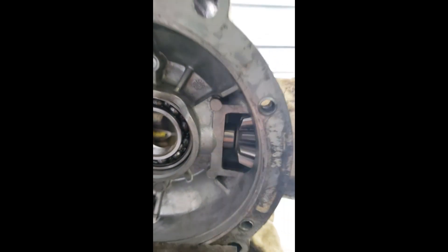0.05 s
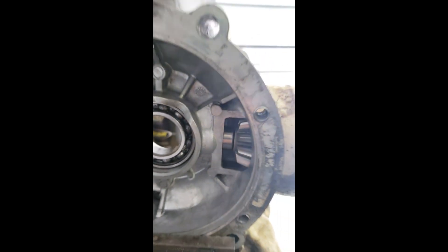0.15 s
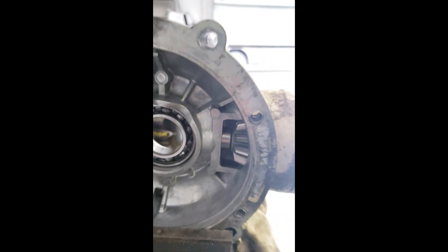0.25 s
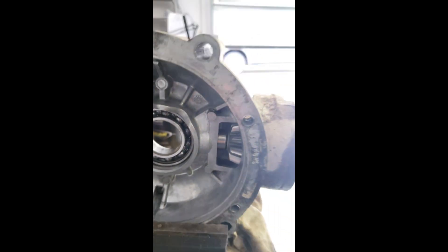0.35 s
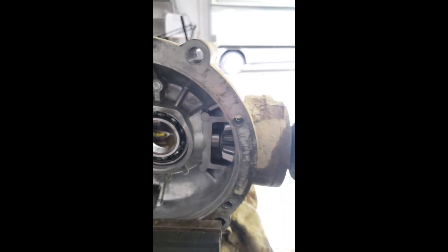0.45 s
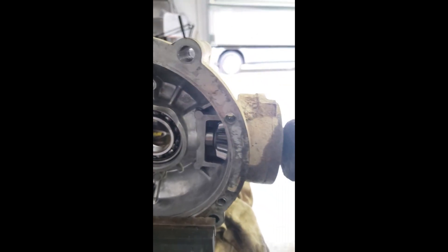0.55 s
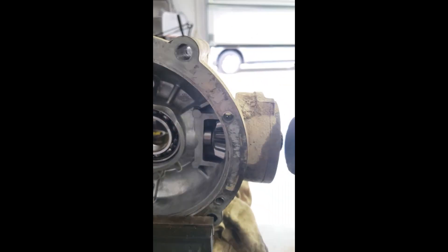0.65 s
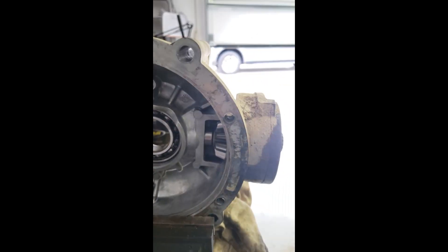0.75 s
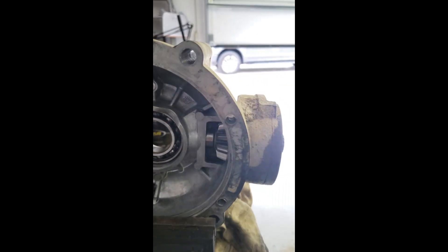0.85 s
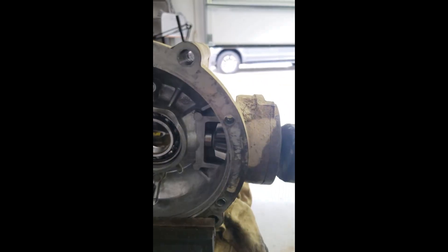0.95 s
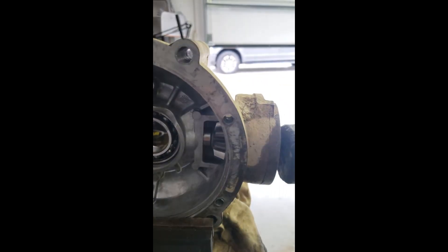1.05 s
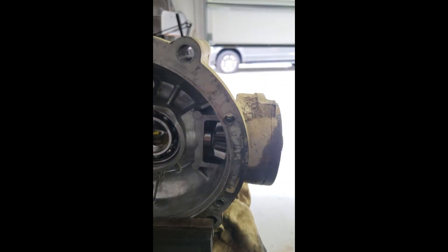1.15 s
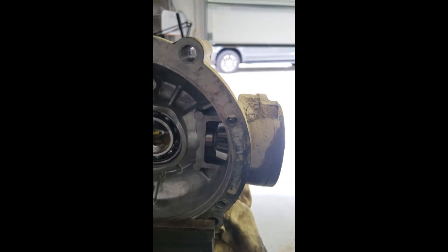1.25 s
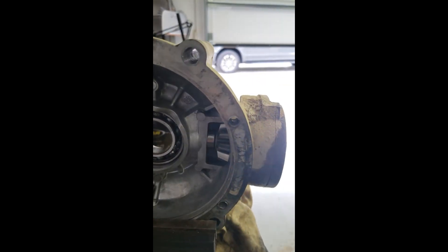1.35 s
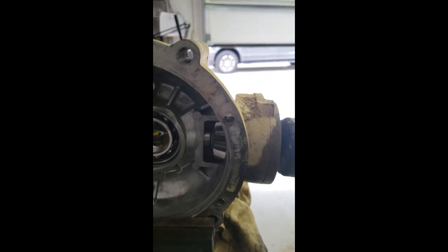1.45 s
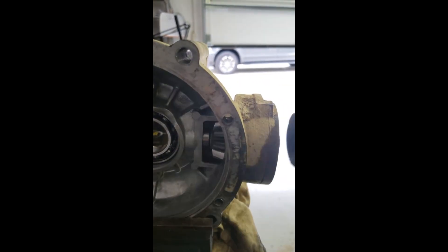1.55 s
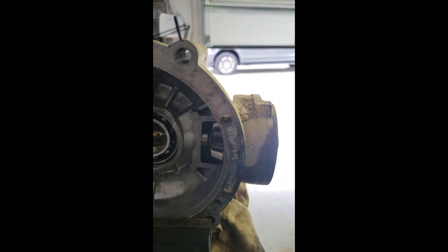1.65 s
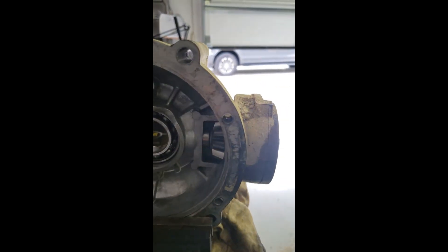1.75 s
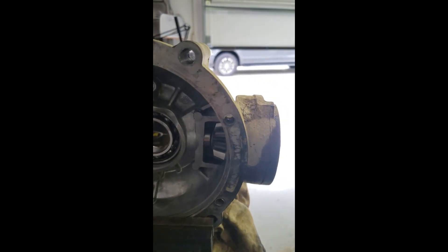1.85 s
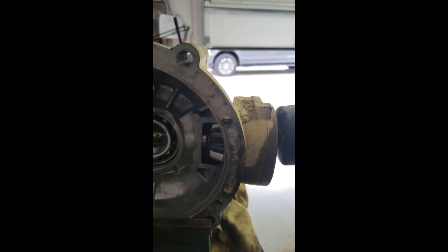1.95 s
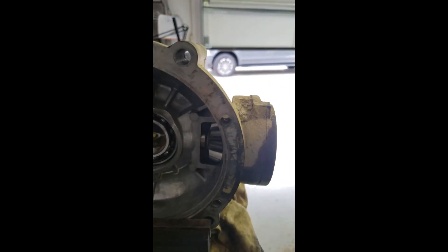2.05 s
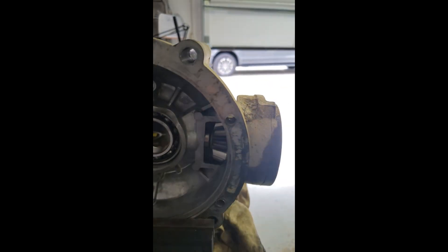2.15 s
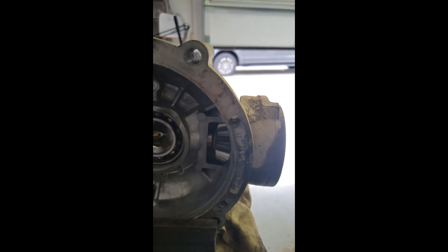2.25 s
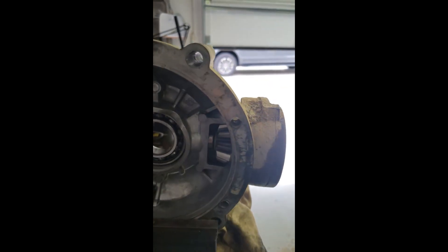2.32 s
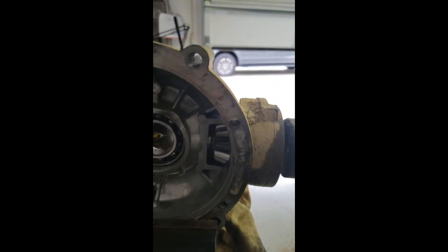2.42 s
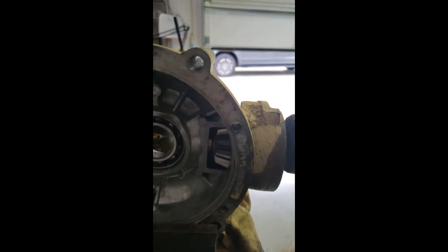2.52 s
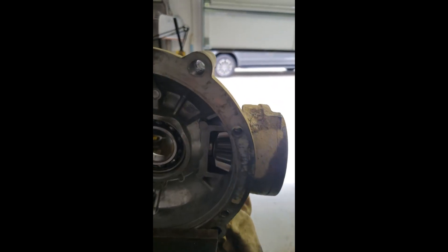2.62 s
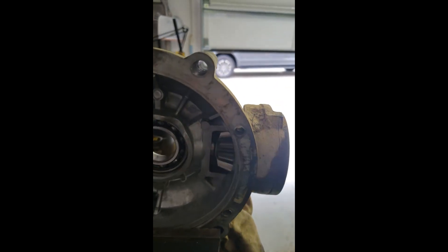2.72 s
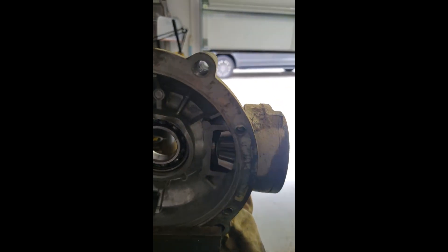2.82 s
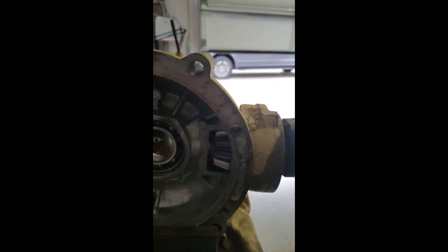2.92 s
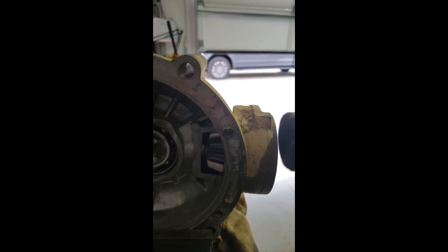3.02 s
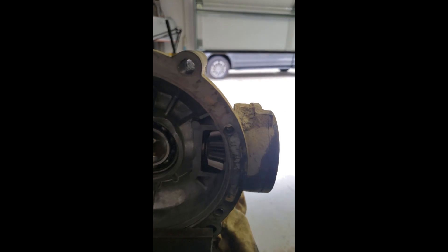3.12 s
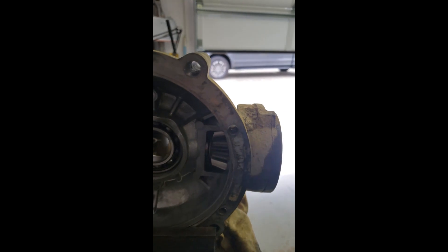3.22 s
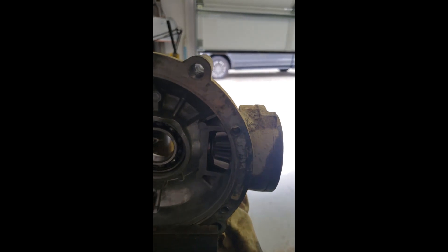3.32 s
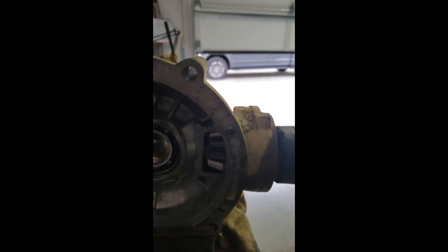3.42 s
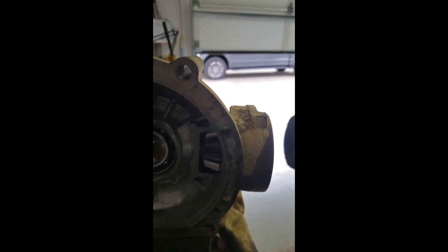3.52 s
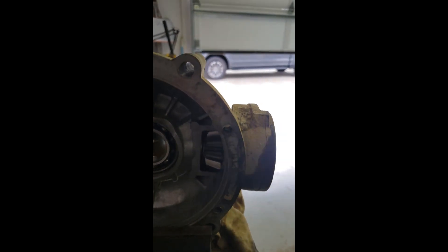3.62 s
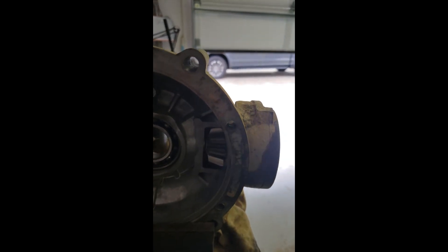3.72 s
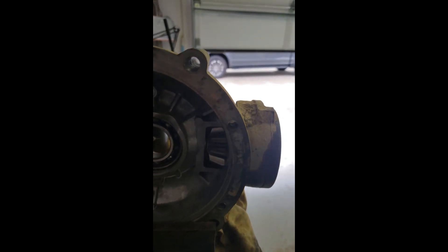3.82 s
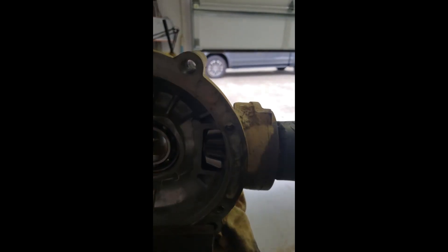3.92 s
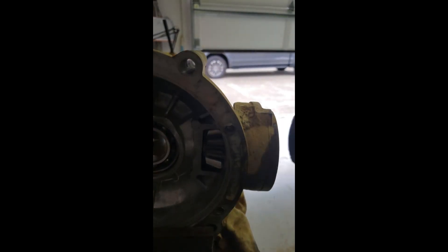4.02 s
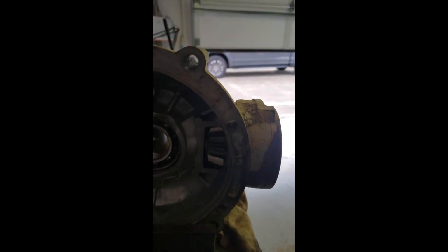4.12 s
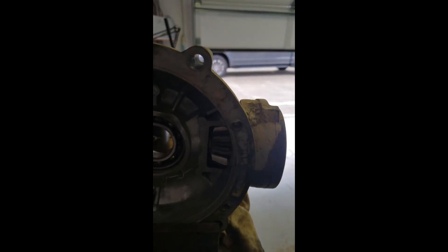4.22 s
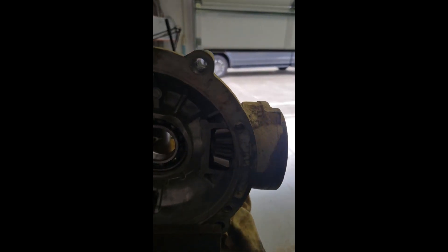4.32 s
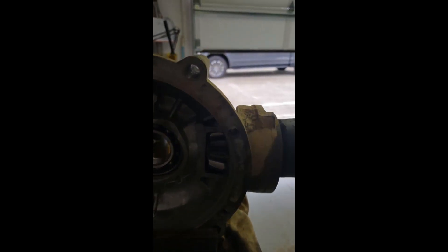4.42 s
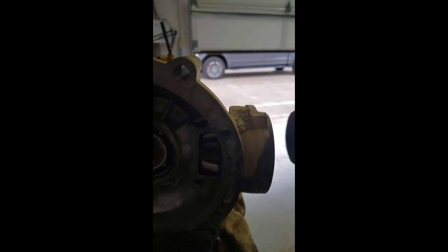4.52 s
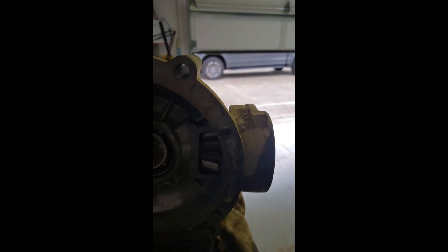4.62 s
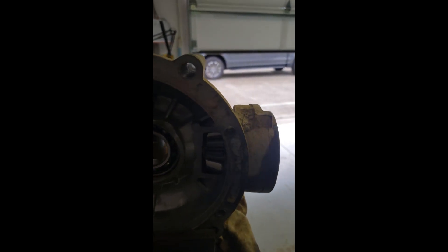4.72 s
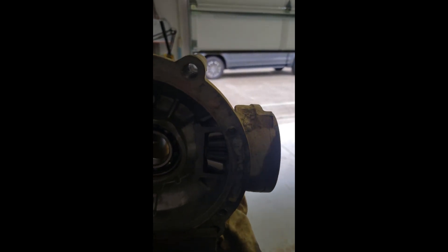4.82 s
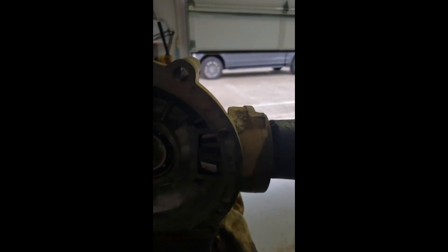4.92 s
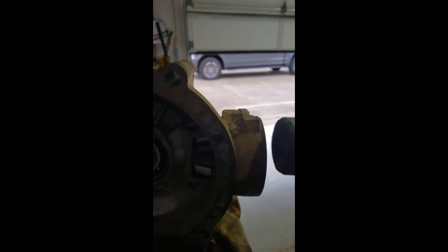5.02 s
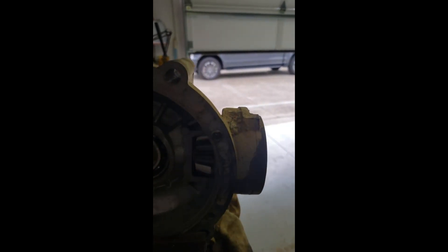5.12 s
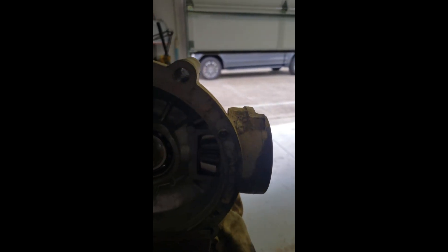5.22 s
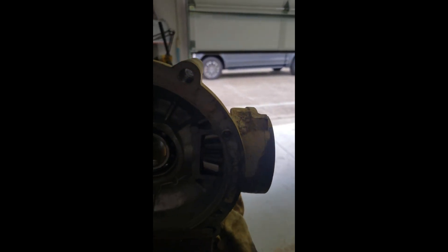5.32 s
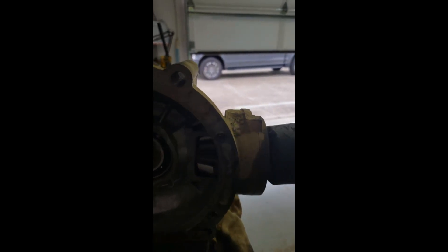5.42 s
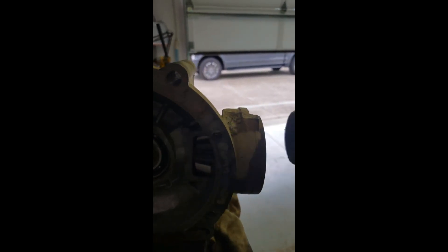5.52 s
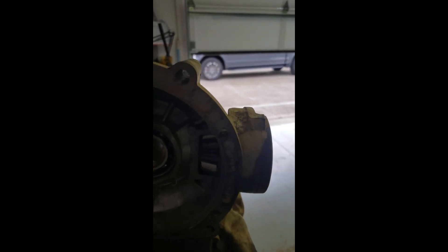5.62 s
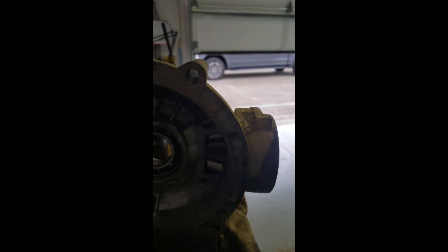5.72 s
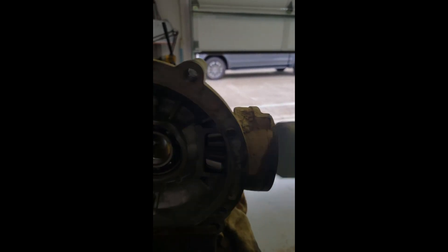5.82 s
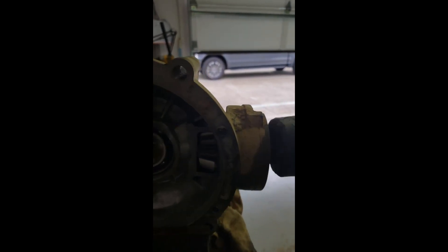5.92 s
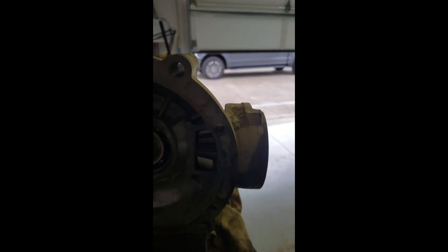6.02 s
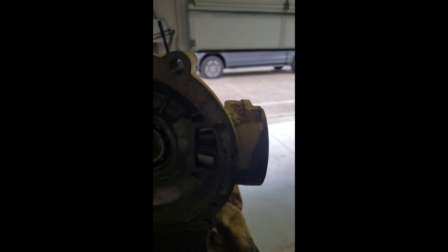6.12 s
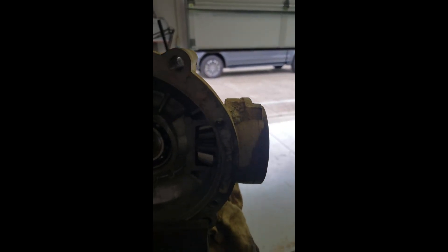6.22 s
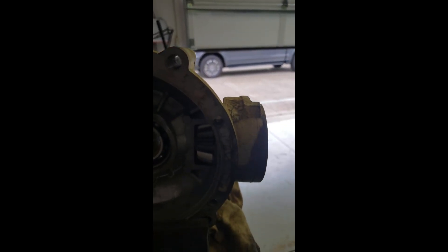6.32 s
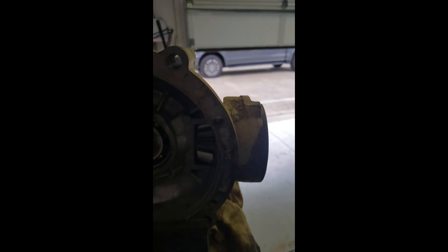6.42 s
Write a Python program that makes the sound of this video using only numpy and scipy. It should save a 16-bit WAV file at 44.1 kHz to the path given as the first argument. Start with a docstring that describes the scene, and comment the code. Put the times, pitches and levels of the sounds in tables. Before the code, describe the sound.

Close, even mallet blows thud and clank on a metal casting, a loose gear rattling after the later hits.

```python
"""A workshop, on the two microphones of a hand-held phone, close to a cast housing on the bench.
A rubber mallet drives a steel gear into it, two blows a second. Each blow thuds through the housing
and clanks the gear against its seat; once the gear has play, it chatters at the blow, springs back and
drops onto its seat a tenth of a second later. A far wall and a short room tail answer, over low
rumble, soft handling bumps, a faint far whine and a fading hiss."""
import sys
import numpy as np
from scipy import signal
from scipy.fft import rfft, irfft
from scipy.io import wavfile
from scipy.ndimage import uniform_filter1d

SR = 44100
rng = np.random.default_rng(int(sys.argv[2]) if len(sys.argv) > 2 else 0)


def log_audio(samples):
    """Write samples as a 16-bit WAV file to the path given in sys.argv[1]."""
    # one column per channel
    frames = np.atleast_2d(samples).T
    # limit to full scale, then quantise
    limited = np.clip(frames, -1, 1)
    pcm = np.round(limited * 32767).astype(np.int16)
    wavfile.write(sys.argv[1], SR, pcm)


N = 284753
T = np.arange(int(SR / 6)) / SR  # time within one short sound [s]
LEFTWARD = np.array([[1], [-1]])  # raises the left microphone, lowers the right
LIGHT_TREBLE_DB = -4  # light contacts are duller than a blow

# mallet blows; squareness is how much of the force reaches the gear: (time [s], force [dB],
# squareness [dB], wall knock over force [dB], upper over lower gear modes [dB])
BLOWS = [(-.002, -27, 0.5, -2, 2), (0.5057, -26.5, -2, 2, 5), (1.014, -25.5, -6, -3, -5),
         (1.5209, -21, -6, -7, 2), (1.996, -22, 4, 0.5, -4), (2.5107, -22.5, 5, 0.5, -3),
         (2.99, -23.5, 7, .5, -6.5), (3.48, -22.5, 4.5, -5, -1), (3.98, -23.5, 8.5, -1, 3.5),
         (4.4829, -25, 4, 0.5, -5.5), (4.9906, -25, 6.3, -10, 0.5), (5.47, -23.5, 6, -14, 1.5),
         (5.931, -24.5, 9, 0.5, 0.5)]
# gear and bearing modes: (frequency [Hz], level [dB], t60 [s], lead at the left microphone [ms])
GEAR = [(2094, -3.5, 0.11, -0.14), (2154, -8.5, 0.12, -0.062), (2919, -5.5, 0.054, 0.084),
        (2885, 0.5, .07, .09), (3135, -4.5, 0.044, 0.12), (3990, -19.5, 0.13, 0.05), (4270, -4, 0.049, .1),
        (4766, -1.5, 0.051, -0.16), (5050, -1, 0.025, -0.052), (5043, 2, 0.055, -0.045),
        (5090, -3.5, 0.03, -0.0084), (5780, -7, .08, -0.0013), (6140, -0.5, 0.058, 0.068),
        (6390, -8, 0.054, -0.035), (6970, -10.5, 0.068, -.04), (8100, -18.5, 0.03, -0.077),
        (11400, -25.5, 0.23, 0.036), (15530, -10.5, .05, -0.098)]


def thud(pattern):
    """The rubber head shoves the housing: one pressure dip, then its low modes."""
    # modes of the housing on its bench: (frequency [Hz], level [dB], t60 [s])
    housing = [(96, 3, 0.1), (154.3, -4, 0.21), (194, -5.5, 0.034), (226.7, 5, 0.078), (273.34, 3, 0.2),
               (301, -1, 0.13), (378.1, -4.5, 0.13), (469, -0.5, .07), (552, 1, 0.038), (594, 6, .07),
               (666, 2.5, 0.044), (751.6, -5.5, 0.13), (775, -5, 0.27)]
    # dense modes of the casting: (frequency [Hz], level [dB])
    spectrum = [(40, -9), (90, -8), (250, 0.5), (390, -1.5), (560, 3), (1200, -8), (2500, -17),
                (8000, -45.5)]
    modes, chance = struck(housing, scatter_db=0.5, detune=0.035, grip_db=-13.5, grip_t60=0.011,
                           blur_hz=18)
    body = -(modes * np.exp(1.6j * chance)).imag.sum(0)
    push = T / .0003
    dip = -push * (2 - push) * np.exp(-push)
    casting = dense_ring(pattern, spectrum, crack_t60=0.0064, ring_t60=0.21, ring_db=-11,
                         rise_s=0.00013, alike_hz=550, change=0.39)
    sound = undb(-2) * burst(body) + undb(-8.5) * burst(dip) + undb(-4) * casting
    return sound * undb(.8 * LEFTWARD)


def knock():
    """The hollow note of the casting's walls, which face the two microphones differently."""
    # wall modes: (frequency [Hz], level [dB], t60 [s])
    walls = [(859, 0, 0.05), (950, 0, 0.023), (1086, -1, 0.057), (1168, -3, 0.055), (1242, -4.5, 0.054),
             (1290, -2, 0.027), (1470, -7.5, 0.044), (1680, -3, 0.078), (1800, -5, 0.04),
             (1960, -8.5, 0.082)]
    modes, chance = struck(walls, scatter_db=4, detune=0.016, grip_db=9, grip_t60=.018, blur_hz=9.9)
    modes = modes * np.exp(np.pi * 1j * chance) * (1 - np.exp(-T / 0.00063))
    apart = np.exp(1.3j * rng.standard_normal(chance.shape))
    return burst(np.array([modes.imag.sum(0), (modes * apart).imag.sum(0)]))


def clank(pattern, treble_db):
    """Steel cracks on steel; treble_db tilts the top of the spectrum."""
    # dense upper modes of the steel: (frequency [Hz], level [dB])
    steel = [(200, -3.5), (600, -3), (1100, -1.5), (1700, 1), (2450, 0.5), (2900, 0.5), (3500, -2.5),
             (5000, 0.5), (6300, -9), (8000, -10), (9500, -21.5), (10800, -23), (12000, -14),
             (15500, -18.5)]
    spectrum = [(hz, db + at([(4000, 0.01), (12000, treble_db)], hz)) for hz, db in steel]
    return dense_ring(pattern, spectrum, crack_t60=0.022, ring_t60=0.09, ring_db=-11.5,
                      rise_s=0.00098, alike_hz=750, change=0.66)


def gear_ring(upper_db):
    """The point of contact favours the gear's lower or upper modes; each radiates its own way."""
    table = np.array(GEAR)
    hz, lead_s = table[:, :1], table[:, 3:] / 1000
    modes, chance = struck(table[:, :3], scatter_db=2, detune=0.0072, grip_db=10, grip_t60=0.011,
                           blur_hz=22)
    onset = 1 - np.exp(-(T / 0.0012) ** 2)
    left = modes * undb(upper_db * (hz > 4500)) * np.exp(np.pi * 1j * chance) * onset
    right = left * np.exp(-2j * np.pi * hz * lead_s)
    return burst(np.array([left.imag.sum(0), right.imag.sum(0)]))


def contacts():
    """Gear meets seat in strikes and rattles: (time [s], clank, ring, upper modes, treble [dB])."""
    # the gear springs back or drops onto its seat: the rows at 0.048 s and 1.567 s spring back # about 45 ms
    # after a blow, the later rows drop back onto the seat # (time [s], clank [dB], ring over clank [dB], upper
    # over lower gear modes [dB])
    drops = [(.048, -43.5, -1.5, -17), (1.5669, -38, -5, -10), (3.581, -37, -6.5, 8),
             (4.085, -38.5, 1.5, 18), (4.585, -43, 1.5, 13), (4.646, -55, -10, -3), (5.103, -50.5, 5, 2),
             (5.574, -52.5, 3, 1), (6.046, -47, 3, 10)]
    loose_from_s, chatter_s, rebound_s = 2.8, 0.0082, .0445
    strikes, rattles = [], []
    for s, force_db, square_db, _, upper_db in BLOWS:
        clank_db = force_db + 1.35 + 0.42 * square_db  # a square blow clanks harder
        ring_db = force_db + square_db
        treble_db = 3.5 + .8 * (force_db + 23)  # a harder blow is brighter
        strikes.append((s, clank_db, ring_db, upper_db, treble_db))
        if s > loose_from_s:
            # the loose gear hits again at once, harder after a square blow, then springs back
            chatter_db = -19 + 1.6 * square_db
            rattles.append((s + chatter_s, clank_db + chatter_db, ring_db + chatter_db, 3.5, treble_db))
            rattles.append((s + rebound_s, clank_db - 21, ring_db - 21.5, -0.5, LIGHT_TREBLE_DB))
    for s, clank_db, ring_over_db, upper_db in drops:
        rattles.append((s, clank_db, clank_db + ring_over_db, upper_db, LIGHT_TREBLE_DB))
    return strikes, rattles


def chink():
    """The loose bearing race chinks when the steel rattles."""
    # modes of the race: (frequency [Hz], level [dB], t60 [s])
    race = [(3120, -5.5, 0.056), (4840, -0.5, 0.054), (4830, -8.5, 0.037), (6700, -9, 0.063),
            (11400, -17.5, 0.18)]
    modes, chance = struck(race, scatter_db=3, detune=0.0025, grip_db=-1, grip_t60=.015, blur_hz=7.7)
    ring = (modes * np.exp(np.pi * 1j * chance)).imag.sum(0)
    return burst(ring * (1 - np.exp(-T / .0012)))


def shudder():
    """The gear slips in its seat and its lowest mode swells for a moment."""
    rough = 1 + 1.7 * uniform_filter1d(rng.standard_normal(len(T)), size=80)
    swell = (1 - np.exp(-T / 0.0027)) * fade(T, 0.063)
    return burst(swell * rough * np.sin(2 * np.pi * GEAR[0][0] * T))


def workshop(into_room, toward_wall):
    """A diffuse tail that lasts longest in the low mids, and a scattered slap from the far wall."""
    # decay of the tail: (frequency [Hz], t60 [s])
    decay = [(100, 0.3), (300, 0.4764), (700, 0.3532), (2000, 0.3647), (5000, 0.2626), (14000, 0.32)]
    # colour of the tail: (frequency [Hz], level [dB])
    tail_spectrum = [(60, -14), (160, -1.5), (400, -10.5), (900, -16.5), (2200, -17), (3200, -13.5),
                     (5500, -17), (14000, -18)]
    # colour of the slap: (frequency [Hz], level [dB])
    slap_spectrum = [(60, -21.5), (160, -12.5), (400, -18), (900, -23), (3000, -23), (5000, -26),
                     (14000, -29.5)]
    slap_s, slap_t60 = .0435, .08
    t = np.arange(int(SR * .6)) / SR
    hz, centres = np.fft.rfftfreq(len(t), 1 / SR), [f for f, _ in decay]
    bands = np.array([at(list(zip(centres, share)), hz) for share in np.eye(len(centres))])[:, None]
    tails = np.array([fade(t, t60) for _, t60 in decay])[:, None] * (1 - np.exp(-(t / 0.015) ** 2))
    tails /= np.linalg.norm(tails, axis=2, keepdims=True)
    slap = (t > slap_s) * fade(np.abs(t - slap_s), slap_t60)
    slap /= np.linalg.norm(slap)
    # the hand-held phone drifts, so each blow meets a new pattern of echoes
    edges = [0] + [int(row[0] * SR) for row in BLOWS[1:]] + [N]
    out = np.zeros((2, N))
    for a, b in zip(edges, edges[1:]):
        band_noise = irfft(rfft(pair_noise(len(t), 710)) * bands, len(t))
        tail = colour((band_noise * tails).sum(0), tail_spectrum)
        echo = colour(slap * pair_noise(len(t), 700), slap_spectrum)
        add(out, a / SR, signal.fftconvolve(into_room[:, a:b], tail, axes=1))
        add(out, a / SR, signal.fftconvolve(toward_wall[:, a:b], echo, axes=1))
    return out


def handling_bumps():
    """The hand bumps softly against the phone, a short low note each time."""
    # (time [s], level [dB], pitch [Hz])
    bumps = [(0.893, -37, 128), (3.269, -40.5, 137), (3.394, -43, 82), (3.46, -38, 111), (4.766, -48, 89),
             (5.403, -44.5, 119), (5.731, -39.5, 66), (6.396, -45, 73)]
    out = np.zeros((2, N))
    for s, db, hz in bumps:
        add(out, s, undb(db) * burst(T * fade(T, 0.026) * np.sin(2 * np.pi * hz * T)))
    return out


def far_whine(flutter):
    """A faint, wavering whine far off swells and dies away."""
    # swells: (time [s], level [dB])
    swells = [(1.15, -80), (2.15, -75), (3.15, -74)]
    pitch_hz, rise_s = 1500, .07
    tone = np.sin(2 * np.pi * np.cumsum(pitch_hz + 3 * flutter) / SR)
    out = np.zeros(N)
    for s, db in swells:
        age = np.maximum(np.arange(N) / SR - s, 0)
        out += undb(db) * (1 - np.exp(-age / rise_s)) * fade(age, t60=2.7) * tone
    return out


def room_tone():
    """Restless rumble and smooth, fading hiss, with the far whine among them."""
    # colour of the rumble: (frequency [Hz], level [dB])
    rumble_spectrum = [(20, -25), (45, -9), (80, 1.5), (120, -1.5), (190, -14.5), (280, -14.5),
                       (400, -31.5), (800, -34.5), (1600, -42.5), (4000, -63)]
    # course of the rumble: (time [s], relative level [dB])
    rumble_level = [(0.0, -55.5), (1.94, -54), (2.88, -64.5), (3.4, -50), (4.04, -58), (4.24, -64),
                    (5.79, -55.5), (5.95, -63), (6.46, -57.5)]
    # colour of the hiss: (frequency [Hz], level [dB])
    hiss_spectrum = [(100, 7), (700, 1.5), (1300, -1.5), (2600, -2.5), (3900, 3), (7300, 1.5), (8500, -7.5),
                     (11000, -6.5), (15500, -4.5)]
    # course of the hiss: (time [s], relative level [dB])
    hiss_level = [(0.0, -68.5), (2.03, -72.5), (3.02, -72.5), (5.0, -82.5), (6.46, -84.5)]
    rumble = colour(pair_noise(N, 120), rumble_spectrum)
    hiss = colour(pair_noise(N, 600), hiss_spectrum)
    # air stirring at each microphone port adds unrelated bass: (frequency [Hz], level [dB])
    port_air = [(20, -6), (70, 4), (130, -5.5), (400, -46), (4000, -79.5)]
    rumble += colour(rng.standard_normal((2, N)), port_air)
    knots = np.arange(0, N, SR // 12)
    flutter = np.interp(np.arange(N), knots, rng.standard_normal(len(knots)))
    rumble *= undb(curve(rumble_level) + 4.5 + 1.2 * flutter) / rumble.std()
    hiss *= undb(curve(hiss_level) + 5.5) / hiss.std()
    return rumble + hiss + far_whine(flutter)


def struck(table, scatter_db, detune, grip_db, grip_t60, blur_hz):
    """Modes varied by each blow, damped and blurred by the rubbing seat, and a random draw for each."""
    hz, db, t60 = np.transpose(table)[:, :, None]
    weight, tuning, chance = rng.standard_normal((len(hz), 3)).T[:, :, None]
    size = undb(db + scatter_db * weight) * fade(T, t60) * (1 + undb(grip_db) * fade(T, grip_t60))
    wander = np.cumsum(rng.standard_normal(size.shape), axis=1) * np.sqrt(2 * np.pi * blur_hz / SR)
    phase = 2 * np.pi * hz * (1 + detune * tuning) * T + uniform_filter1d(wander, size=130, axis=1)
    return size * np.exp(1j * phase), chance


def dense_ring(pattern, spectrum, crack_t60, ring_t60, ring_db, rise_s, alike_hz, change):
    """Countless close modes: a crack, then a ring; their pattern shifts a little from blow to blow."""
    grain = pattern + change * pair_noise(len(T), alike_hz)
    onset = 1 - np.exp(-(T / rise_s) ** 2)
    decay = fade(T, crack_t60) + undb(ring_db) * fade(T, ring_t60)
    return burst(colour(grain * onset * decay, spectrum))


def pair_noise(count, alike_hz):
    """White noise at two microphones: alike in the bass, unrelated in the treble."""
    mid, side = rfft(rng.standard_normal((2, count)))
    alike = 1 / (1 + (np.fft.rfftfreq(count, 1 / SR) / alike_hz) ** 2)
    return irfft(mid * np.sqrt((1 + alike) / 2) + LEFTWARD * side * np.sqrt((1 - alike) / 2), count)


def colour(x, points, size=8192):
    """Causal filter with the response (frequency [Hz], level [dB])."""
    cepstrum = irfft(np.log(undb(at(points, np.fft.rfftfreq(size, 1 / SR)))))
    cepstrum[1:size // 2] *= 2
    cepstrum[size // 2 + 1:] = 0
    impulse = irfft(np.exp(rfft(cepstrum)))[None, :size // 2]
    return signal.fftconvolve(x, impulse, axes=1)[:, :x.shape[1]]


def burst(x):
    """Let a short sound die out smoothly and scale it to the energy of 10 ms at full level."""
    x = x * np.minimum(1, 2 * (1 - T / T[-1]))
    return x / np.sqrt(np.mean(np.sum(x ** 2, axis=-1)) * 100 / SR)


def undb(db):
    """Decibels to gain."""
    return 10 ** (np.asarray(db) / 20)


def fade(t, t60):
    """Exponential decay, 60 dB in t60 seconds."""
    return np.exp(-np.log(1000) * t / t60)


def curve(rows):
    """Join timed levels by straight lines."""
    return np.interp(np.arange(N) / SR, *np.transpose(rows))


def at(points, hz):
    """Read a spectrum on a log-frequency axis."""
    f, db = np.transpose(points)
    return np.interp(np.log(np.maximum(hz, 1)), np.log(f), db)


def add(out, s, x):
    """Mix a short sound in at time s."""
    i = int(round(s * SR))
    a, b = max(i, 0), min(i + x.shape[-1], N)
    out[:, a:b] += x[..., a - i:b - i]


def scene():
    """Blows and rattles on the same steel close up, with the workshop behind."""
    # the gear slips: (time [s], shudder level [dB], clank level [dB])
    slips = [(.521, -31, -34), (5.949, -26, -22)]
    body, gear = np.zeros((2, 2, N))
    casting, steel = pair_noise(len(T), 1400), pair_noise(len(T), 630)
    for s, force_db, _, knock_db, _ in BLOWS:
        add(body, s, undb(force_db) * (thud(casting) + undb(knock_db) * knock()))
    strikes, rattles = contacts()
    for s, clank_db, ring_db, upper_db, treble_db in strikes + rattles:
        add(body, s, undb(clank_db) * clank(steel, treble_db))
        add(gear, s, undb(ring_db) * gear_ring(upper_db))
    # the race has little play, so its chink grows more slowly than the rattle
    for s, _, ring_db, *_ in rattles:
        add(gear, s, undb(0.86 * ring_db - 14) * chink())
    for s, db, clank_db in slips:
        add(gear, s, undb(db) * shudder())
        add(body, s, undb(clank_db) * clank(steel, LIGHT_TREBLE_DB))
    add(body, 2.0518, undb(-37.5) * clank(steel, treble_db=14.5))  # a bright tick as the gear works free
    gear *= undb(.5 * LEFTWARD)
    # the gear rings out of the housing's mouth straight at the phone, so less of it fills the room
    room = workshop(into_room=body + undb(-7) * gear, toward_wall=body + gear)
    background = (room_tone() + handling_bumps()) * undb(0.39 * LEFTWARD)
    return body + gear + room + background


def record(dry):
    """The phone rounds the highest peaks and cuts the top."""
    top_hz = 15850
    return signal.sosfilt(signal.ellip(8, .2, 70, top_hz, fs=SR, output="sos"), np.tanh(dry))


dry = scene()
out = record(dry)
log_audio(out)
```